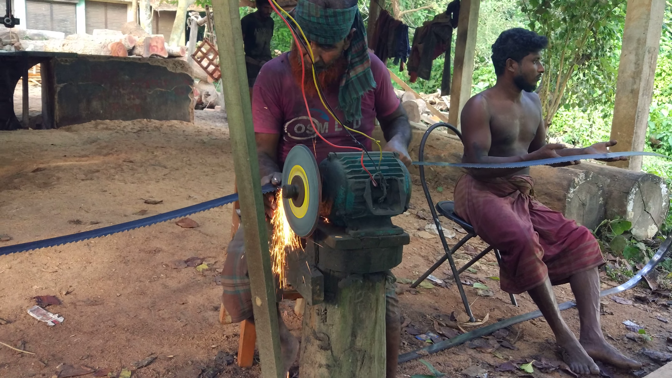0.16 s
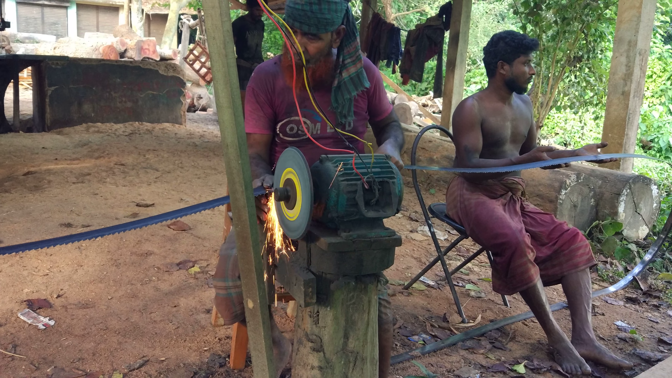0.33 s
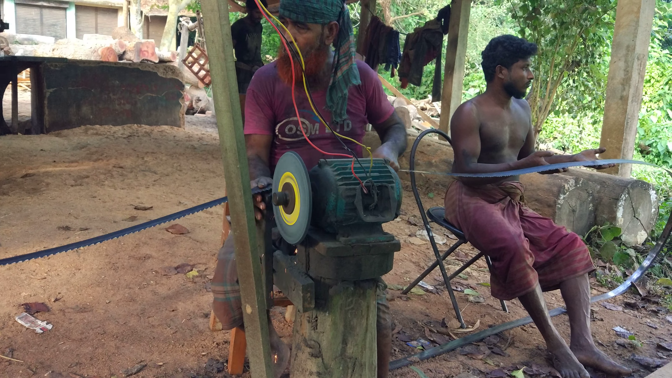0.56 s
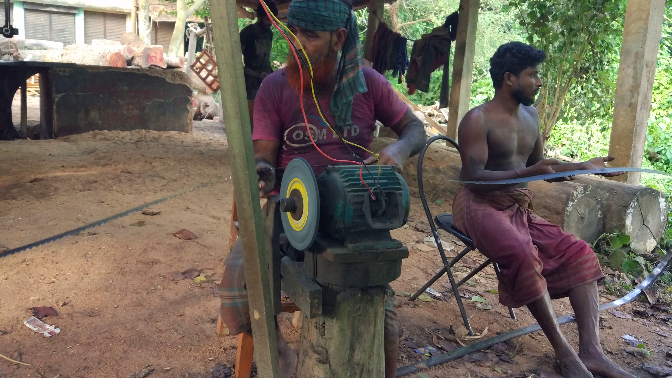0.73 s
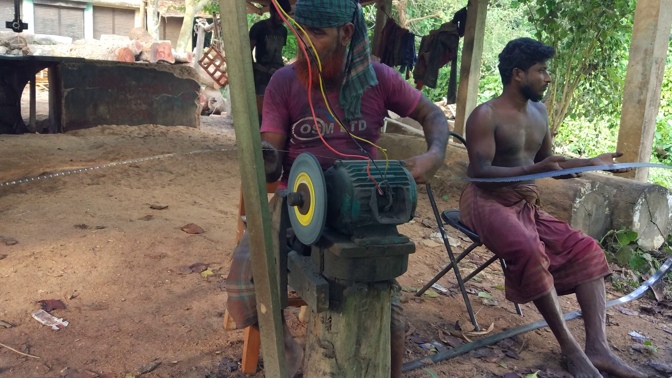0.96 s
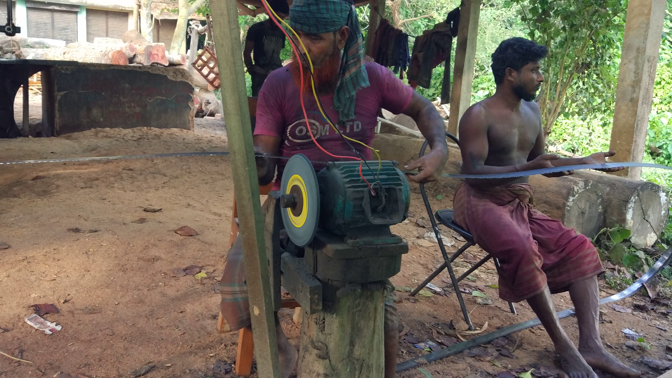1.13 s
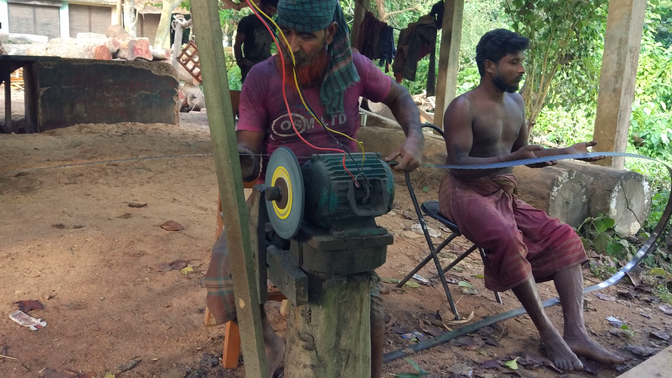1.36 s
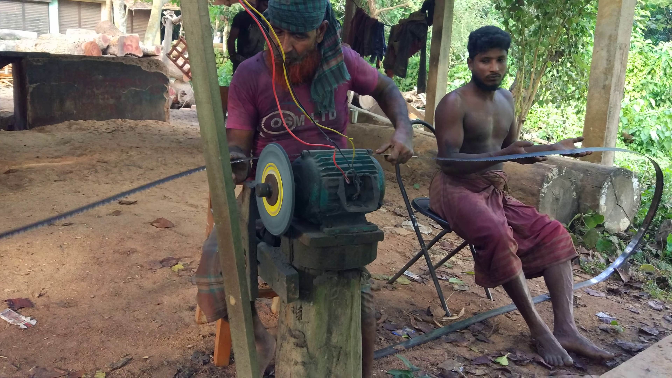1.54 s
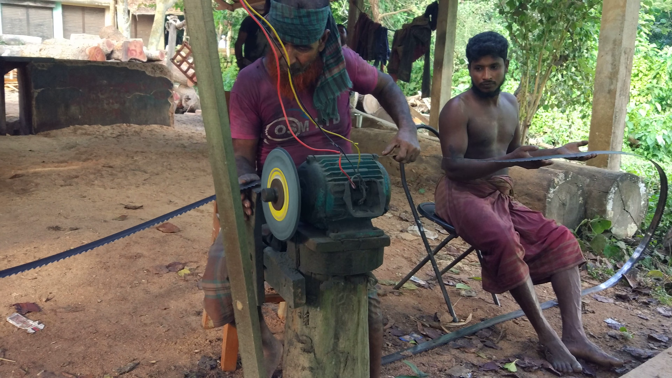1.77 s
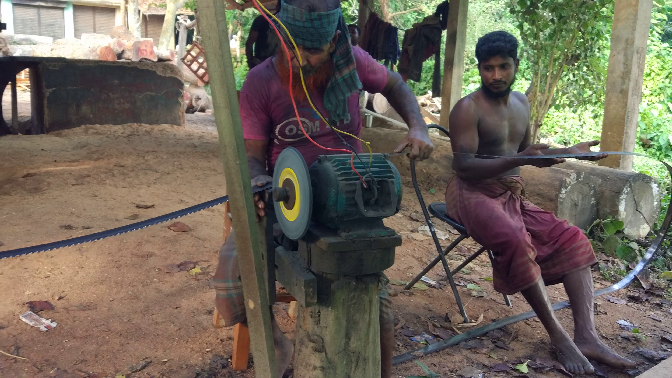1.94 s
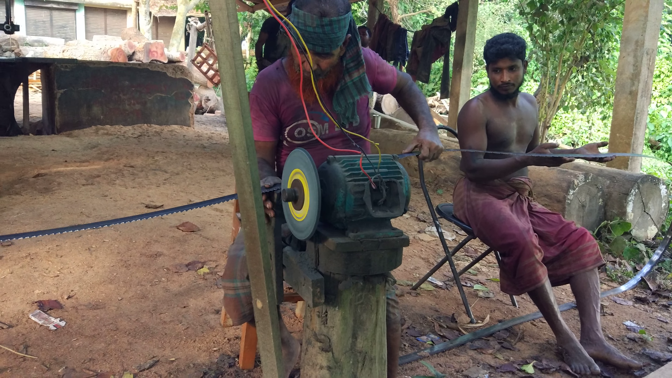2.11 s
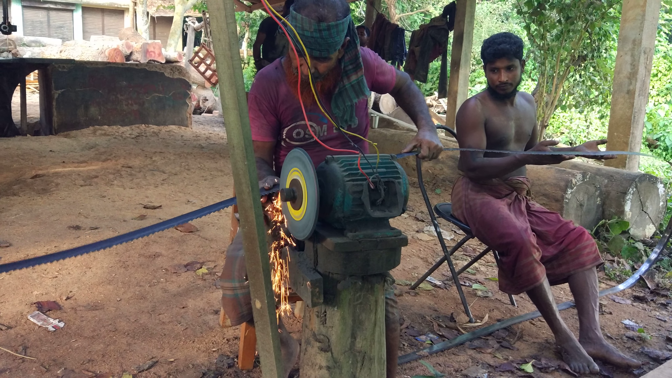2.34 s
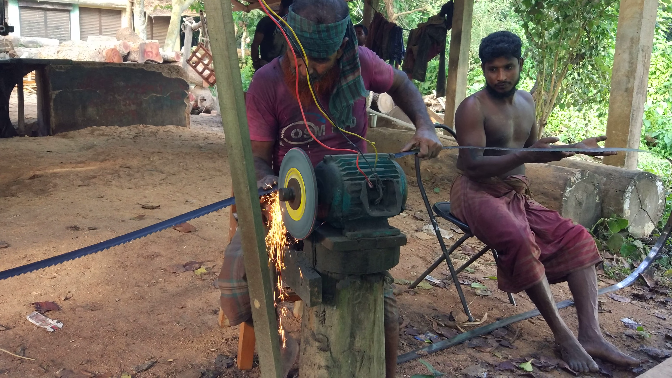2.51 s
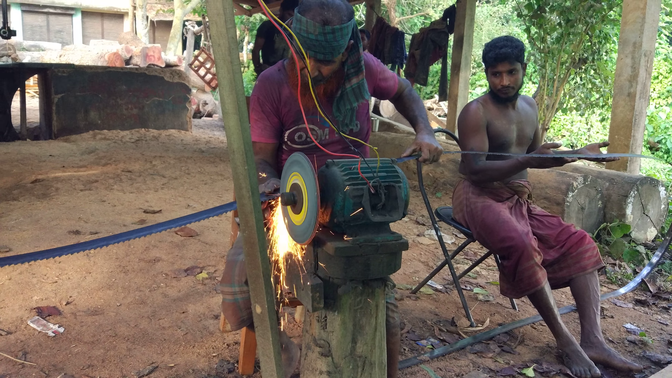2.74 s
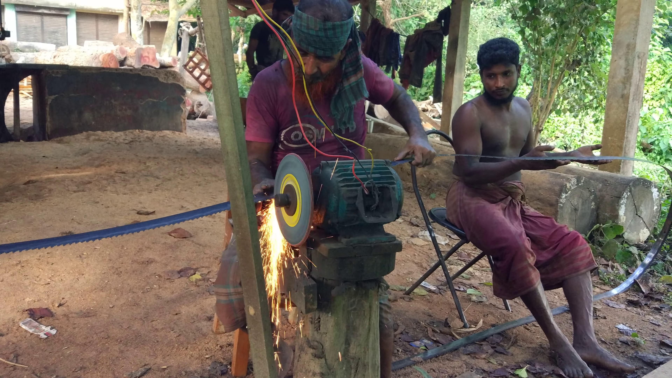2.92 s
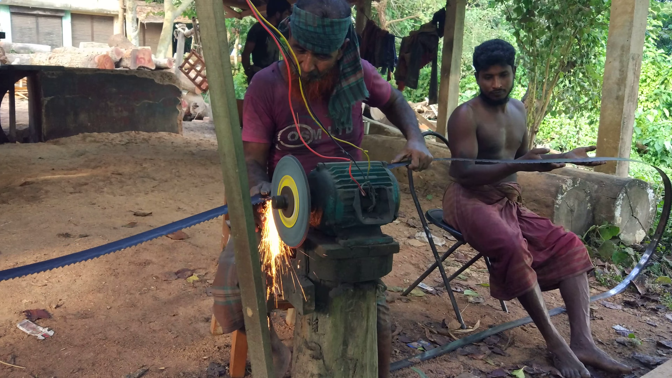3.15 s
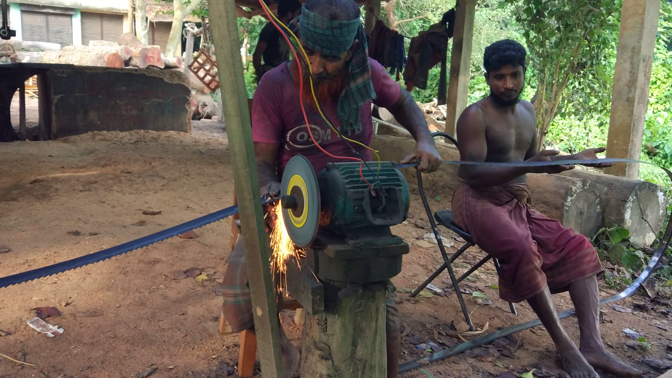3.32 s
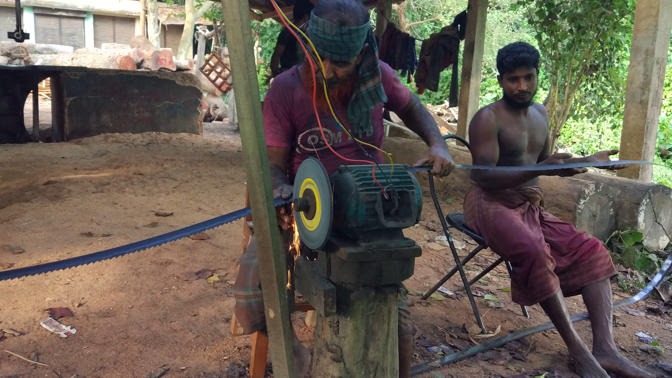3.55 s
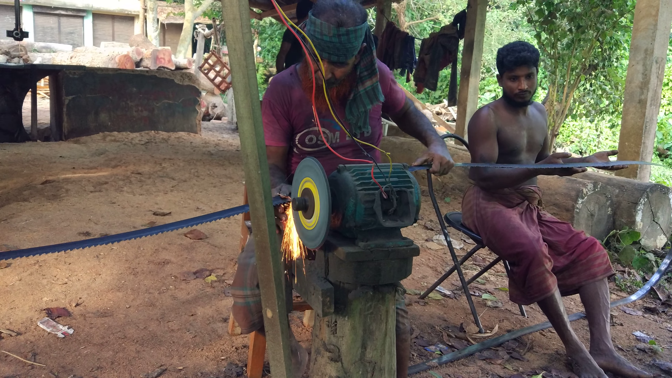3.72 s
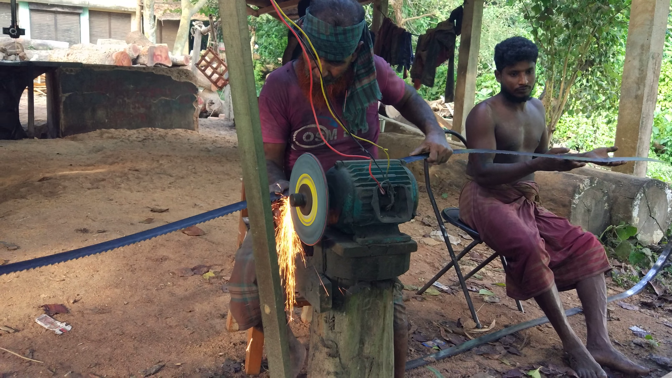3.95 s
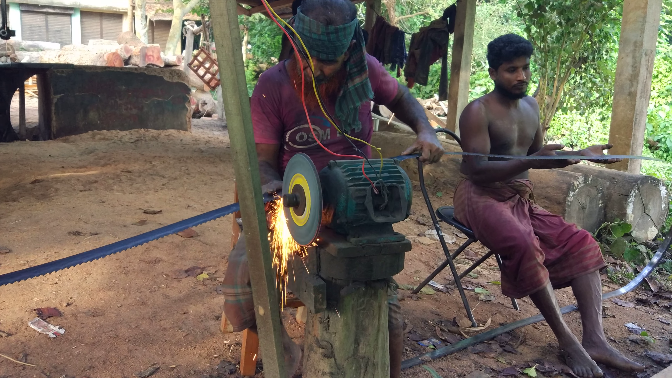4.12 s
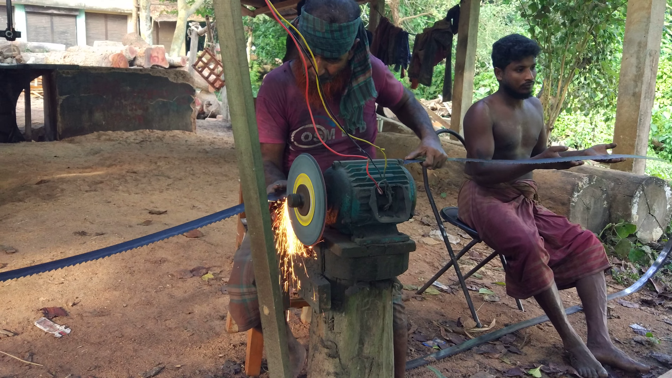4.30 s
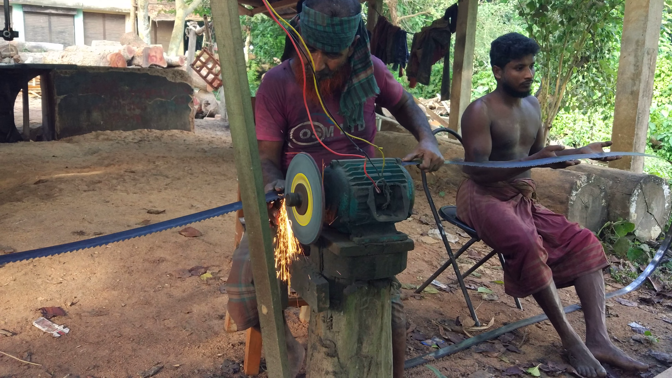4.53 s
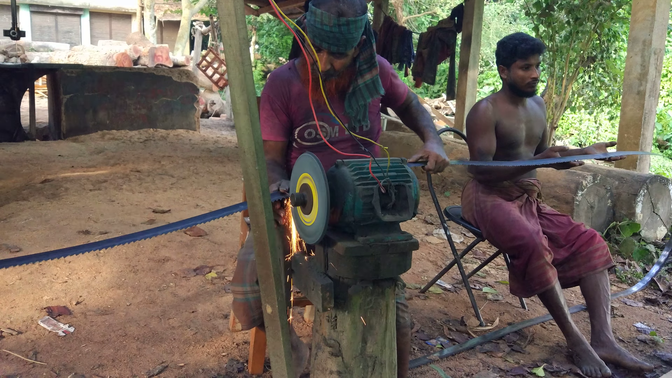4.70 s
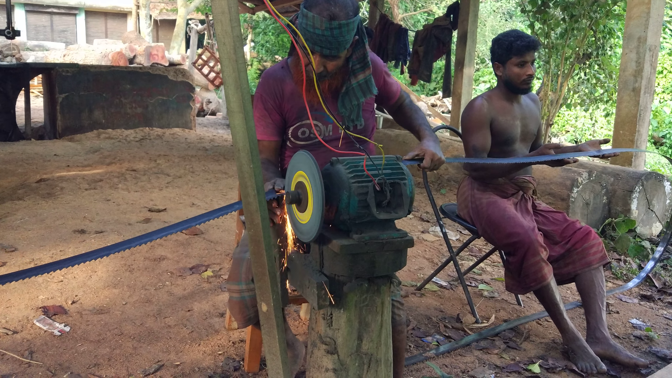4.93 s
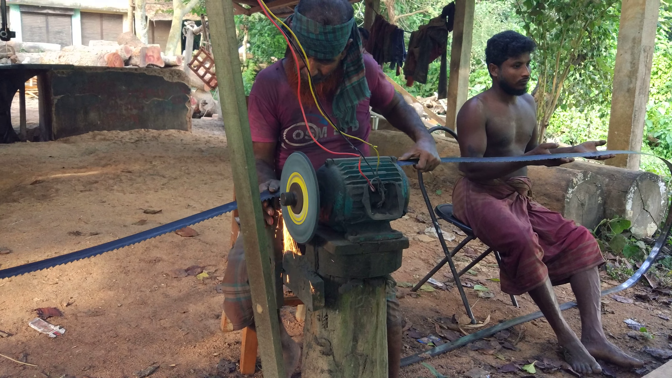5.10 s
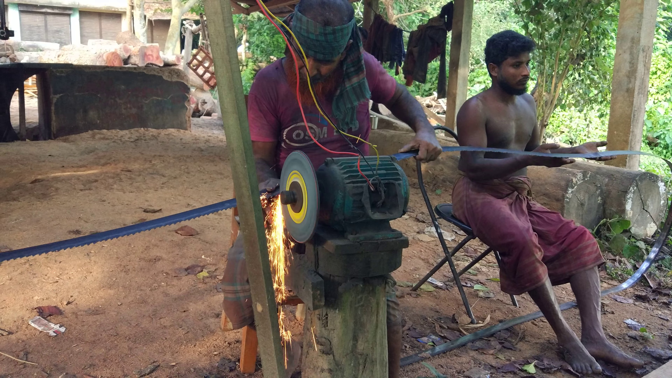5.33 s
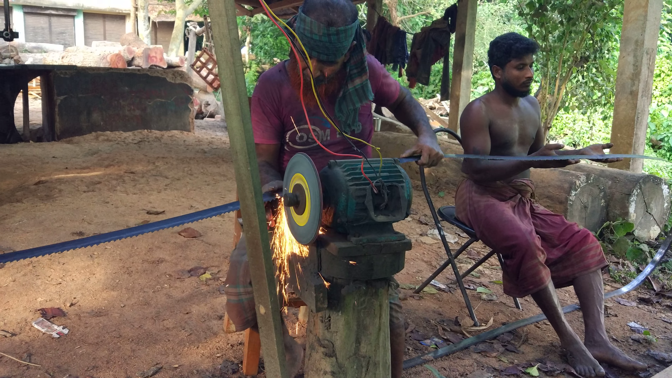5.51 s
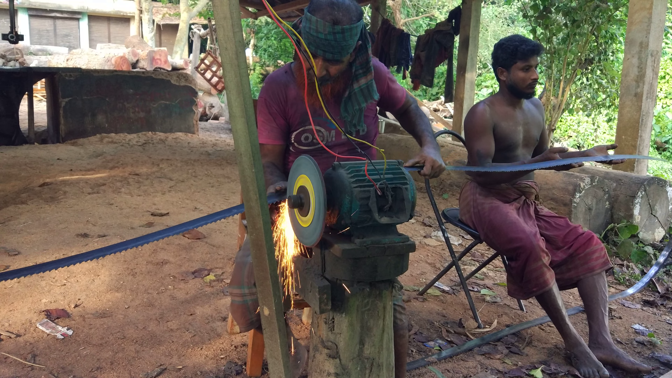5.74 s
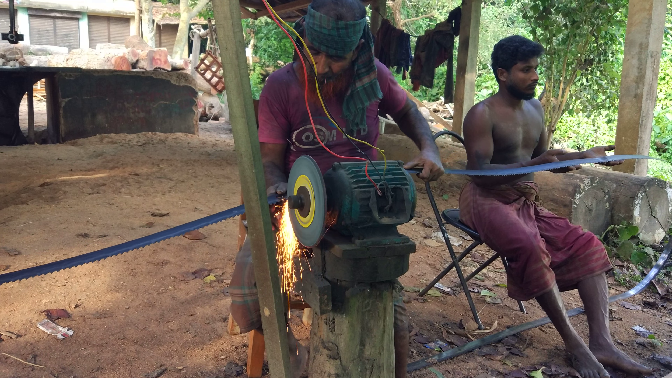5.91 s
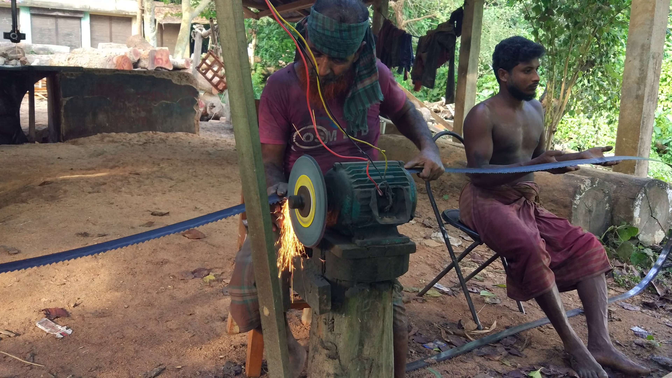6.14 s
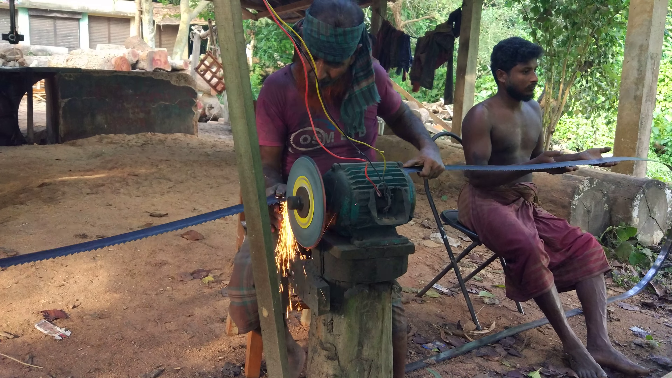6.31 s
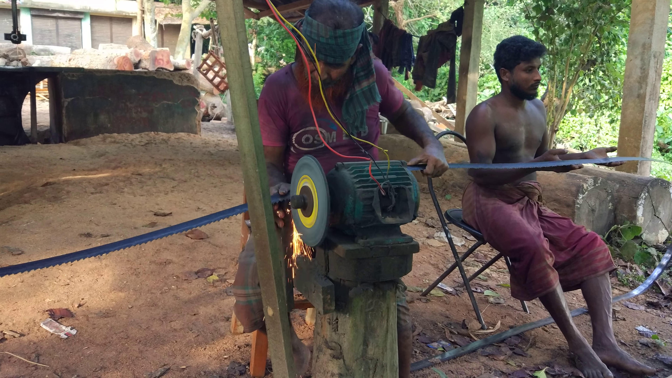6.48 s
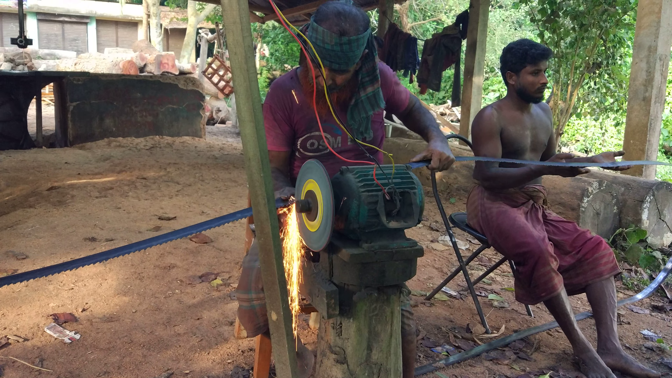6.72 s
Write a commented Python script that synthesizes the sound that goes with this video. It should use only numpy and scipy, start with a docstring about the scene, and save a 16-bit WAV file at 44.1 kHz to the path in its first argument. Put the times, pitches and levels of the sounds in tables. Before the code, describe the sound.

A motor-driven wheel is already grinding a long steel saw blade, making a loud, bright hiss that pulses rapidly and carries high metallic ringing. At about 0.6 seconds the wheel lifts, leaving the quieter motor rattling on its post with a faint, thin ticking. From 0.7 to 2.3 seconds the blade slides along its rest in soft, grainy hisses, knocking twice around 1.5 seconds with a dull flutter.

At 2.3 seconds the loud grinding returns. It breaks off for an instant and bites again at about 3.9, 5.3 and 6.6 seconds. Each pass shifts in tone as the wheel moves from the tooth's tip to its back, where the steel chatters and rings. Another knock comes near 4.8 seconds. The motor runs underneath throughout, and the grinding is still going when the sound ends at about 7 seconds. The open shed adds a short, light echo.

```python
"""A motor-driven grinding wheel sharpens a long band-saw blade in an open shed.
At first its grit is scraping a tooth, pulsing once a turn and making the steel ring. The wheel lifts,
and the motor rattles on its post while the blade is pulled along its rest, hissing and knocking twice.
From 2.3 s four more teeth follow, with one more knock. The wheel works first the tip, then the back
of a tooth, and is still on the tip of the last one when the sound ends."""
import sys
import numpy as np
from scipy import signal
from scipy.fft import rfft, irfft, next_fast_len
from scipy.io import wavfile
from scipy.ndimage import uniform_filter1d, map_coordinates

SR = 44100
rng = np.random.default_rng(int(sys.argv[2]) if len(sys.argv) > 2 else 0)


def file_out(sig):
    """Save sig as 16-bit WAV at sys.argv[1]."""
    # one column per channel
    cols = np.atleast_2d(sig).T
    # limit, then scale
    lim = np.clip(cols, -1, 1)
    pcm = np.round(lim * 32767).astype(np.int16)
    wavfile.write(sys.argv[1], SR, pcm)


N = 302526

# each tooth: (bite [s], slide to the back [s], lift [s], back's share at the tip [0-1],
# first touch against the hiss [dB], hiss [dB], screech [dB], low rings [dB], high ring [dB], motor [dB])
TEETH = [(-.8, -.45, .64, .2, 0, -13, -1.5, 1, -1.5, -2),
         (2.303, 2.70, 3.842, .22, -5, -13.7, 1, 0, -.5, -1),
         (3.905, 4.12, 5.21, .2, 0, -13.2, -1.5, -2, 1.5, 0),
         (5.294, 5.51, 6.57, .4, -6, -13.2, -1.5, 3.5, 3, 1),
         (6.633, 7.0, 7.9, .25, 0, -13.3, -3, 1, -2, -1)]
# changes added to every tooth's levels near its bite, slide and lift:
# (time offset [s], hiss [dB], screech [dB], low rings [dB], high ring [dB], motor [dB])
AFTER_BITE = [(0, 0, 2, -4, 1, -3), (.008, 4.5, -6, -4, 1, -3), (.027, 0, -2, -4, 0, -4),
              (.1, 1, -1, 1.5, 0, -6)]
AROUND_SLIDE = [(-.02, 0, 1, 4, 0, -6), (.02, .5, 1, -1, 1, -5), (.2, 1, -2, -3, -.5, -5)]
BEFORE_LIFT = [(-.35, 0, 0, -2, -1.5, -3), (-.09, -.5, 1, 1, 3, -2), (0, -1.5, 3.5, 3, 4.5, -2)]
# the wheel's speed on each tooth, a little below idle: (speed [turns/s])
TOOTH_SPEEDS = [25.28, 25.23, 25.33, 25.26, 25.25]
# ringing notes of a tooth's tip, its back, the motor and the sliding blade:
# (pitch [Hz], width before narrowing [Hz], level [dB])
TIP_RINGS = [(772, 44, -13), (949, 32, -15), (1042, 30, -13.5), (2180, 39, -12), (2693, 150, -8),
             (3490, 60, -1), (3690, 50, -2), (4190, 42, -7), (5335, 65, -6), (5565, 51, -2),
             (5900, 18, -20), (6460, 57, -12), (6680, 66, -3), (7090, 310, 5), (7720, 98, -3),
             (7700, 57, -17), (8090, 91, -3), (9970, 40, -7), (10700, 30, -16), (12900, 90, -6)]
BACK_RINGS = [(776, 23, -19), (1190, 70, -16), (1373, 41, -19), (2003, 62, -10.5), (2183, 40, -5),
              (2437, 45, -2), (2825, 177, -13.5), (3500, 110, -7), (3720, 130, -4), (4100, 110, -7),
              (4520, 63, -14), (5055, 14, -2), (5225, 37, -11.5), (5570, 35, 1.5), (6710, 27, 0),
              (6917, 30, 9), (7030, 120, 5.5), (7515, 30, 1), (7309, 35, 0), (7713, 45, 3), (8190, 80, -16),
              (9550, 86, -10), (10580, 38, -8), (11500, 150, -13), (11470, 40, -18), (12960, 290, -7.5)]
MOTOR_RINGS = [(388, 86, -13), (786, 30, 10), (870, 120, -1), (1480, 51, -9), (1886, 13, -4),
               (2728, 96, -9), (3730, 92, -8), (4200, 170, -14), (4840, 150, -8), (6200, 77, -27),
               (6850, 50, -24), (7660, 62, -13.5), (8500, 130, -31)]
PULL_RINGS = [(2860, 210, -8), (4560, 350, 2.5), (5260, 200, -14), (6850, 300, 1), (7600, 120, -20)]
# the hiss between those notes: (frequency [Hz], level [dB])
TIP_HISS = [(300, -51), (600, -52), (960, -46), (1690, -26), (2100, -9), (3290, -7), (4150, -11.5),
            (5000, -11), (5880, -11.5), (6300, -8.5), (6900, -1.5), (9000, -5.5), (13300, -7), (16000, -13)]
BACK_HISS = [(300, -82), (600, -93), (950, -26), (1250, -20.5), (1560, -22.5), (1900, -13.5), (2200, -11.5),
             (3290, -10), (3600, -15.5), (4340, -18), (5470, -1.5), (6200, -11), (7100, 3), (9000, -6),
             (13300, -14.5), (16000, -17)]
MOTOR_HISS = [(59, -63), (100, -30), (206, -9.5), (290, -9), (380, -4), (676, -15.5), (784, -5), (950, -9),
              (1060, -19), (1950, -11), (2270, -19), (2580, -4), (3700, -20), (4870, -17), (5600, -20),
              (16000, -80)]
PULL_HISS = [(1180, -30), (2000, -12), (2910, -9.5), (3770, -14), (4530, -9.5), (6940, -6.5), (7770, -11),
             (12000, -19.5), (13900, -23), (16000, -45)]
# quiet gaps between the steel's notes: (frequency [Hz], width [Hz], depth [0-1])
STEEL_GAPS = [(870, 60, .5), (1925, 40, .6), (2340, 50, .4), (3300, 120, .6), (3920, 80, .7),
              (4370, 100, .45), (4650, 80, .4), (5100, 40, .6), (6300, 120, .5)]
# notes the wheel's high spot strikes on a tooth's back: (pitch [Hz], width [Hz], level [dB], delay [s])
CHATTER_RINGS = [(350, 250, -24, .004), (785, 55, 5, 0), (1190, 62, 7.5, .006), (1340, 60, 1, .004),
                 (2183, 55, 11, .008), (2437, 50, 5, .006), (2800, 250, -2, .005), (3500, 50, 5, .009),
                 (3720, 80, 13, .011), (5560, 70, 10, .01)]
# the idling motor leans left: (frequency [Hz], left minus right [dB])
IDLE_LEAN = [(300, 4), (800, 4), (1300, 5), (2700, 5), (4000, 5), (5600, 4), (8000, 2)]
# the blade is pulled along its rest, and drums slackly on the post:
# (start [s], rise [s], hold [s], fall [s], level [dB])
PULLS = [(.7, .08, .1, .1, -47), (.75, .05, 1.49, .02, -58), (.875, .03, .095, .19, -35),
         (1.05, .1, .03, .07, -45), (1.46, .01, .004, .14, -31.5), (1.46, .04, .125, .035, -42),
         (1.70, .058, .08, .15, -32), (1.972, .01, .002, .02, -42), (1.96, .09, .002, .04, -44),
         (2.243, .013, .002, .015, -43)]
DRUMMING = [(1.44, .04, .14, .08, -42)]
# the blade knocks on its rest: (time [s], ring [dB], crack [dB])
KNOCKS = [(1.47, -40, -29), (1.6, -36, -35.5), (4.774, -26.5, -31)]
# the notes of a knock: (pitch [Hz], level [dB], time to fade by 60 dB [s])
KNOCK_RINGS = [(330, -13.5, .08), (511, 6, 0.24), (616, 7.5, 0.17), (1640, -20, 0.11), (1840, 15.5, 0.11),
               (3010, 2, 0.15)]
# how the whole sound leans: (frequency [Hz], left minus right [dB])
BALANCE = [(100, -6), (500, -5), (800, -6), (1200, -5), (2000, 0), (2600, 1), (4000, 1), (5600, 3),
           (7500, -1.2), (12000, -.6)]

IDLE_SPEED_HZ, IDLE_MOTOR_DB = 25.57, -37.5
SECONDS = np.arange(N) / SR
FFT_SIZE = next_fast_len(N + SR)
BINS_HZ = np.maximum(np.arange(FFT_SIZE // 2 + 1) * SR / FFT_SIZE, 1)


def from_db(db):
    """Turn decibels into a gain."""
    return 10 ** (np.asarray(db) / 20)


def unit_power(x):
    """Scale a signal to an average power of 1."""
    return x / np.sqrt(np.mean(x ** 2) + 1e-20)


def curve(points):
    """Join (frequency, value) points into a curve over all frequencies."""
    hz, value = np.transpose(points)
    return np.interp(np.log(BINS_HZ), np.log(hz), value)


def lean(points):
    """Left and right gains from a table of level differences."""
    return from_db(curve(points) / 2 * np.array([[1], [-1]]))


def filtered(x, response):
    """Give each frequency of a signal its own gain and delay."""
    return irfft(rfft(x, FFT_SIZE) * response, FFT_SIZE)[..., :N]


def drift(rate):
    """A smooth random wobble of size about 1."""
    return unit_power(map_coordinates(rng.standard_normal(400), [SECONDS * rate * 2], order=3))


def resonance(hz, sharpness, bins=BINS_HZ):
    """The response of something that rings at one pitch."""
    return 1 / (1 + 1j * sharpness * (bins / hz - hz / bins))


def swell(x, hz, sharpness, db):
    """Raise or lower the sound around one pitch."""
    return x + (from_db(db) - 1) * filtered(x, resonance(hz, sharpness))


def body(notes, hiss, hiss_db, narrow):
    """An object's tone colour: ringing notes of alternating sign over a broad hiss."""
    grid = BINS_HZ[::16]
    rings = sum((-1) ** k * from_db(db) * resonance(hz, hz / (width * narrow), grid)
                for k, (hz, width, db) in enumerate(notes))
    response = from_db(curve(hiss) + hiss_db) + np.interp(BINS_HZ, grid, rings)
    return response / np.sqrt(np.mean(np.abs(response) ** 2))


def once_a_turn(turns, at):
    """One click each time the wheel passes a point of its turn."""
    return np.diff(np.floor(turns - at), prepend=-1)


def contact(fade_s=.03):
    """Bite, slide and lift over time: whether the wheel touches, the back's share and five levels."""
    touching, rows = np.zeros(N), []
    for bite, slide, lift, tip_share, touch_db, *levels_db in TEETH:
        touching += (SECONDS >= bite) * np.clip((lift - SECONDS) / fade_s + .5, 0, 1)
        moments = [(bite, AFTER_BITE), (slide, AROUND_SLIDE), (lift, BEFORE_LIFT)]
        stages = [[at + s, *np.add(db, levels_db)] for at, table in moments for s, *db in table]
        stages[0][1] += touch_db
        back_shares = [0, 0, tip_share / 2, tip_share, tip_share, .75, .75, .85, .85, .45]
        rows += [(s, share, *db) for (s, *db), share in zip(stages, back_shares)]
    times, *columns = np.transpose(sorted(rows))
    return [uniform_filter1d(touching, size=90)] + [np.interp(SECONDS, times, c) for c in columns]


def turning_force(turns, keep, repeat_hz, spot_db, spot_at, spot_width, blow_db, beat_hz, treble_beat):
    """A rough surface comes round again and again; its high spot presses harder and lands a blow."""
    places = 1730   # around one turn
    noise = rng.standard_normal((220, places))
    surface = signal.lfilter([np.sqrt(1 - keep ** 2)], [1, -keep], noise, axis=0)[30:]
    bumps = surface[turns.astype(int), (turns % 1 * places).astype(int)]
    grit = rng.standard_normal((2, N)) + 1.25 * rng.standard_normal(N)
    coarse = 1 / (1 + (BINS_HZ / repeat_hz) ** 2)   # coarse bumps repeat, fine grit is always new
    rough = filtered(1.38 * bumps, np.sqrt(coarse)) + filtered(grit, np.sqrt(1 - coarse))
    spot = from_db(spot_db * np.exp((np.cos(2 * np.pi * (turns - spot_at)) - 1) / spot_width))
    blows = once_a_turn(turns, spot_at) * from_db(blow_db + 1.35 * drift(11))
    beating = rough * unit_power(spot) + blows
    steadier = rough * unit_power(spot ** treble_beat)
    low = 1 / (1 + (BINS_HZ / beat_hz) ** 2)   # the beat is heard mostly in the low notes
    return filtered(beating, low) + filtered(steadier, 1 - low)


def wandering(x, depth_db, patch_s, patch_hz):
    """The contact point wanders, so the high notes swell and sink in narrow streaks."""
    hz, times, cells = signal.stft(x, SR, nperseg=2048)
    grid = np.meshgrid(hz / patch_hz, times / patch_s, indexing="ij")
    patches = map_coordinates(rng.standard_normal((600, 100)), grid, order=1)
    gain = from_db(depth_db * patches * np.clip(hz[:, None] / 1500 - 1.4, 0, 1))
    return signal.istft(cells * unit_power(gain), SR, nperseg=2048)[1][:, :N]


def grinding(turns, touching, back_share, hiss_db, screech_db, low_db, ring_db):
    """Grit hammers the steel, which rings differently at a tooth's tip and back."""
    force = turning_force(turns, keep=.74, repeat_hz=5000, spot_db=5.5, spot_at=.35, spot_width=.27,
                          blow_db=19, beat_hz=2000, treble_beat=.35)
    force = wandering(force, depth_db=4, patch_s=.25, patch_hz=40)
    force *= touching * from_db(hiss_db + .66 * drift(18))
    gaps = np.prod([1 - depth * resonance(hz, hz / width) for hz, width, depth in STEEL_GAPS], axis=0)
    tip = filtered(force * (1 - back_share), body(TIP_RINGS, TIP_HISS, hiss_db=-6, narrow=.37) * gaps)
    back = filtered(force * back_share, body(BACK_RINGS, BACK_HISS, hiss_db=-5, narrow=.77) * gaps)
    steel = tip + back + chatter(turns, touching * back_share * from_db(hiss_db))
    steel = swell(steel, hz=2670, sharpness=1.1, db=screech_db)
    steel = swell(steel, hz=900, sharpness=2.2, db=low_db)
    return swell(steel, hz=2185, sharpness=14, db=ring_db)


def chatter(turns, pressing):
    """One soft blow a turn makes a few notes of the blade swell and die."""
    blows = once_a_turn(turns, at=.11) * pressing * from_db(1.3 * drift(7.9))
    rings = sum(from_db(db) * resonance(hz, hz / width) ** 2 * np.exp(-2j * np.pi * BINS_HZ * delay)
                for hz, width, db, delay in CHATTER_RINGS)
    return from_db(23.5) * filtered(blows, rings)


def motor(turns, load, level_db):
    """An unbalanced shaft knocks its bearings every turn and rings the housing and post."""
    force = turning_force(turns, keep=.85, repeat_hz=600, spot_db=5, spot_at=.87, spot_width=.066,
                          blow_db=35 - 11 * load, beat_hz=1430, treble_beat=.1)
    rattle = filtered(force, body(MOTOR_RINGS, MOTOR_HISS, hiss_db=7, narrow=.56))
    idling = filtered(rattle, lean(IDLE_LEAN))
    sound = unit_power(load * rattle + (1 - load) * idling) * from_db(level_db)
    return swell(sound, hz=810, sharpness=4, db=-7 * load)   # the pressed blade damps the housing


def ticks(turns):
    """A thin, high tick once a turn, coming and going."""
    clicks = once_a_turn(turns, at=.34) * from_db(-3.5 + 3.4 * drift(7))
    return filtered(clicks, resonance(hz=7820, sharpness=22) ** 2)


def strokes(rows):
    """The loudness of strokes that rise, hold and fall; their powers add."""
    power = 0
    for start, rise, hold, fall, db in rows:
        moments = start + np.cumsum([0, rise, hold, fall])
        power += from_db(np.interp(SECONDS, moments, [-70, db, db, -70], left=-120, right=-120)) ** 2
    return np.sqrt(power)


def pulls():
    """Steel slides on steel with a grainy hiss, nearer the left, and the slack blade drums dully."""
    grains = rng.standard_normal((2, N)) * from_db(1.1 * drift(24.8))
    hiss = unit_power(filtered(grains, body(PULL_RINGS, PULL_HISS, hiss_db=1.5, narrow=.56)))
    dull = signal.butter(2, [280, 520], "band", fs=SR, output="sos")
    drum = unit_power(signal.sosfilt(dull, grains[0]))
    return strokes(PULLS) * from_db([[3.5], [0]]) * hiss + strokes(DRUMMING) * drum


def knocks():
    """The blade hits its rest: a bright crack, and notes each struck with a random strength."""
    out, age = np.zeros(N), np.arange(SR // 4) / SR
    bright = signal.butter(2, [1300, 4500], "band", fs=SR, output="sos")
    attack = 1 - np.exp(-age / .0014)
    for start, ring_db, crack_db in KNOCKS:
        rings = sum(from_db(db + rng.normal(0, 4.1) - 60 * age / fade_s) * np.sin(2 * np.pi * hz * age)
                    for hz, db, fade_s in KNOCK_RINGS)
        crack = signal.sosfilt(bright, rng.standard_normal(len(age))) * from_db(9.5 - 60 * age / .22)
        knock = from_db(ring_db - 15) * rings * attack + from_db(crack_db) * crack
        out[round(start * SR):][:len(age)] += knock
    return out


def shed(x, echo_above_hz=2200, dull_hz=14000, echo_share=.72, fade_s=.34):
    """Direct sound plus a fading echo on each side; the echo is strongest in the treble."""
    age = np.arange(SR // 2) / SR
    echoes = rfft(rng.standard_normal((2, len(age))) * from_db(-60 * age / fade_s), FFT_SIZE)
    echoes /= np.sqrt(uniform_filter1d(np.abs(echoes) ** 2, size=400))   # even out their tone
    share = echo_share / (1 + (echo_above_hz / BINS_HZ) ** 2) / (1 + (BINS_HZ / dull_hz) ** 4)
    direct = np.exp(-2j * np.pi * BINS_HZ / SR * np.array([[4], [0]]))   # left is 4 samples late
    response = np.sqrt(1 - share) * direct + np.sqrt(share) * echoes
    return filtered(x, response * lean(BALANCE))


def scene():
    """On a tooth the motor slows a little, and its sound is turned down under the loud grinding."""
    touching, back_share, hiss_db, screech_db, low_db, ring_db, motor_db = contact()
    load = uniform_filter1d(touching, size=4000)
    tooth = np.searchsorted([bite for bite, *_ in TEETH], SECONDS) - 1
    speed_hz = IDLE_SPEED_HZ + (np.take(TOOTH_SPEEDS, tooth) - IDLE_SPEED_HZ) * load
    turns = .05 + np.cumsum(speed_hz) / SR
    blade = grinding(turns, touching, back_share, hiss_db, screech_db, low_db, ring_db)
    blade += knocks() + pulls()
    return shed(blade + motor(turns, load, IDLE_MOTOR_DB + load * motor_db) + ticks(turns))


def record(dry):
    """Peaks are rounded, the microphone drops the bass, and the highest treble is cut."""
    rounded = 1.14 * np.tanh(dry / 1.33)
    thin = signal.sosfilt(signal.butter(2, 184, "high", fs=SR, output="sos"), rounded)
    return signal.sosfilt(signal.cheby2(22, 60, 15950, fs=SR, output="sos"), thin)


dry = scene()
out = record(dry)
file_out(out)
```